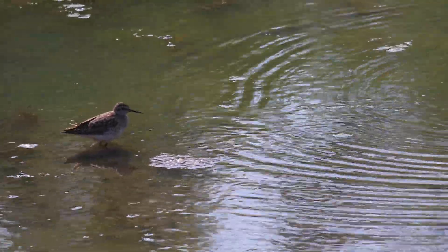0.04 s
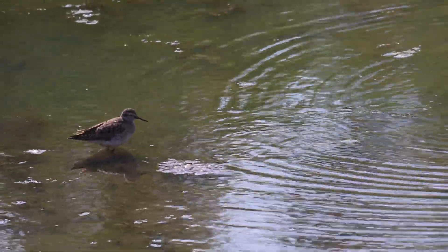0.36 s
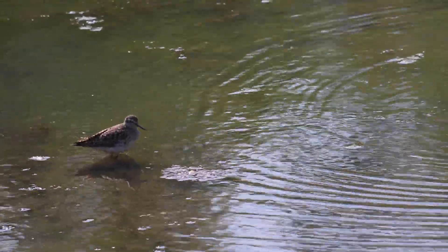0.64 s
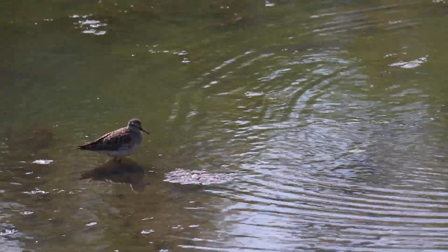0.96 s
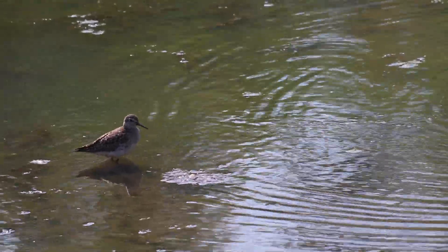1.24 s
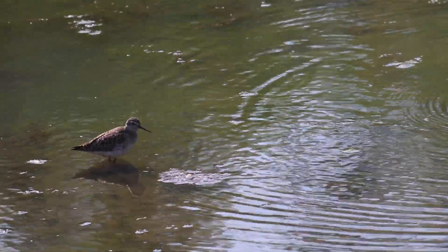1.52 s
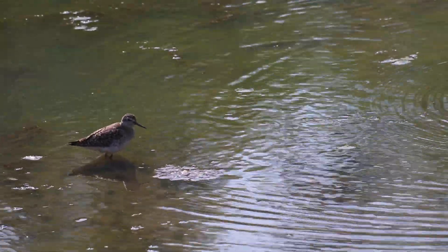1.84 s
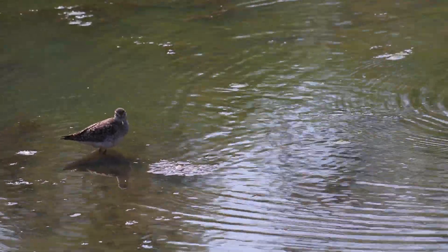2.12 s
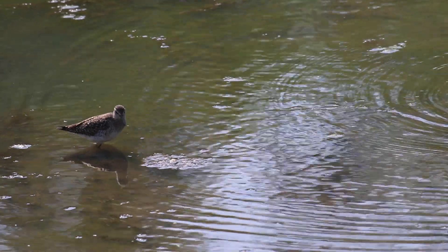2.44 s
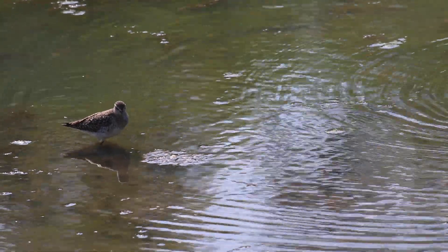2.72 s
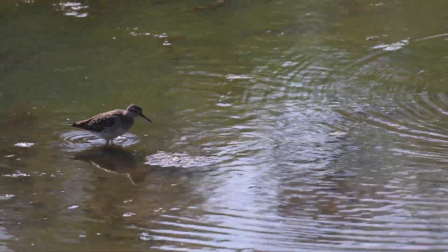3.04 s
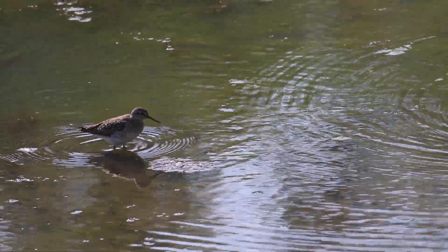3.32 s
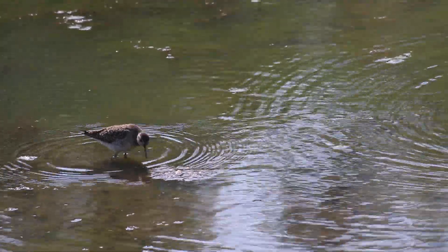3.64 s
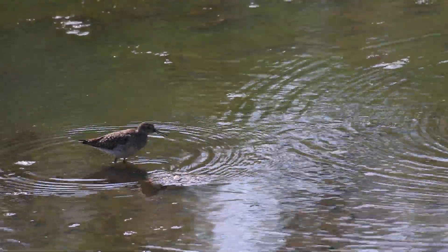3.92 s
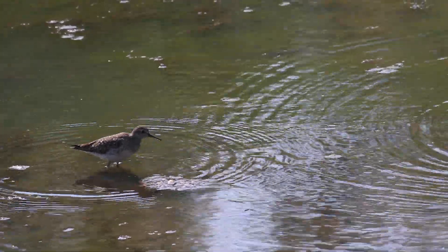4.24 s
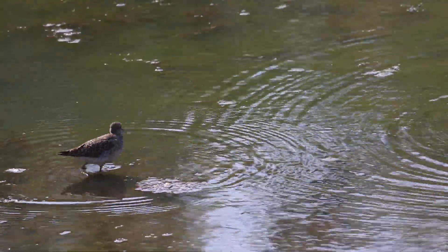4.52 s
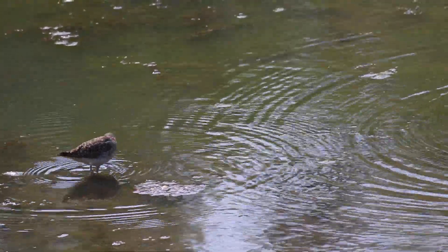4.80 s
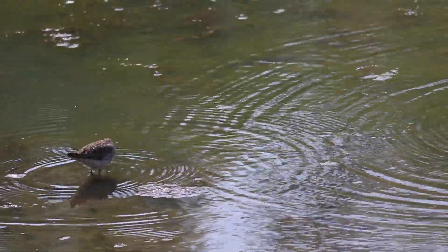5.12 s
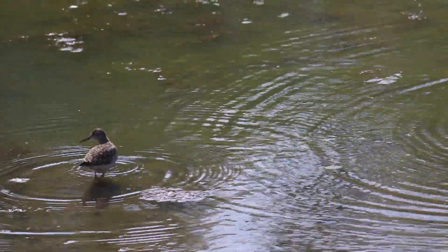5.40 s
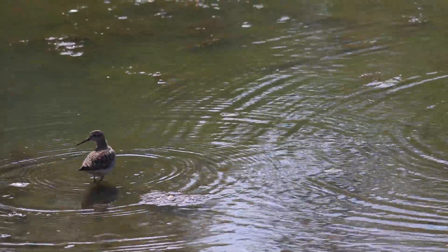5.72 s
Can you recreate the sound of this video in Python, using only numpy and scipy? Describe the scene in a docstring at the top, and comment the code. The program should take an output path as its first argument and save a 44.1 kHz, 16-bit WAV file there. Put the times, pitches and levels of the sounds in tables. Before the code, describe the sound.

A quiet pond margin with a faint steady hiss, dominated by gusts of wind on the microphone. For the first second the air is fairly calm: a distant songbird warbles faint, slurred whistles, and a few small dry ticks sound close by at about 0.5 seconds. A run of thin high peeps follows from 0.8 to 1.9 seconds. Wind swells into a lumpy low rumble with short thumps around 1.4 to 1.7 seconds. A faint, high buzzing trill comes at 2 to 2.6 seconds. The loudest gust hits near 3 seconds, thumping mostly on the right and fading by 3.6. In the lull, faraway song and brief high chirps echo softly. Milder buffeting returns from about 5 seconds to the end, along with a second faint trill and one sharp, close dry tick at 5.6 seconds.

```python
"""Gusts of wind buffet two microphone ports at a quiet pond margin: a lumpy rumble swells and dies,
and each eddy lands as a short low thump on one side. Some way off, small birds whistle, chip, peep
and trill in gliding near-sine tones that echo off the banks; the farthest are just a blur of noise.
Twice something dry ticks close by. A faint steady hiss lies under it all, and a limiter ducks
the mix on the hardest thumps."""
import sys
import numpy as np
from scipy import signal
from scipy.fft import rfft, irfft
from scipy.io import wavfile
from scipy.ndimage import uniform_filter1d

SR = 44100
rng = np.random.default_rng(int(sys.argv[2]) if len(sys.argv) > 2 else 0)


def generate_wav(sig):
    """Save sig (samples, or channels by samples) to the path in sys.argv[1] as 16-bit PCM at SR."""
    pcm = np.round(np.clip(np.atleast_2d(sig).T, -1, 1) * 32767).astype(np.int16)
    wavfile.write(sys.argv[1], SR, pcm)


N = 258426
TIME, FREQS = np.arange(N) / SR, np.fft.rfftfreq(N, 1 / SR)

# Levels are set before each layer's trim. Pan is left minus right. Arch is the bend at mid-note.
# tone of the background wash: (frequency [Hz], relative level [dB])
AIR_SPECTRUM = [(15, -61), (25, 4), (60, 7.5), (150, -0.5), (290, -5), (480, -5), (600, -11), (820, -6),
                (1100, -13), (1750, -15), (2300, -14), (3200, -15), (5500, -20), (15500, -27.5)]
# stereo image of the wash: (frequency [Hz], left-right likeness [0-1])
AIR_LIKENESS = [(60, 0.91), (130, 0.79), (300, 0.82), (640, 0.64), (1400, 0.52), (3100, 0.036),
                (7000, 0.012)]
# far songs blurred by their echoes, plus a high haze behind the peeps: (time [s], length [s], centre [Hz],
# width [Hz], level [dB])
FAR_PHRASES = [(0, 0.11, 3560, 300, -61), (0.096, 0.33, 2700, 500, -66), (0.301, 0.047, 4600, 2000, -58.5),
               (0.353, 0.52, 3720, 240, -65), (1.201, 0.58, 5100, 350, -69), (1.182, 0.66, 1560, 460, -57),
               (1.269, 0.42, 3200, 220, -63.5), (1.681, 1.48, 2250, 420, -61),
               (1.943, 0.23, 3230, 1800, -61.5), (2.097, 0.31, 2850, 200, -64),
               (2.737, 0.26, 3350, 180, -61.5), (3.026, 0.82, 2320, 422, -59), (3.2, 0.43, 1410, 597, -63),
               (3.875, 0.51, 3780, 400, -65), (4.001, 0.9, 2280, 386, -59), (4.652, 0.058, 4600, 1500, -59),
               (5.122, 0.61, 1640, 220, -60.5)]
# a warbling songbird's slurs: (time [s], length [s], start [Hz], end [Hz], arch [Hz], level [dB])
WHISTLE_NOTES = [(0, 0.02, 2625, 2220, 80, -54), (.012, 0.028, 2300, 2400, 265.5, -55),
                 (.027, 0.061, 2685, 2600, 279, -54), (.16, 0.027, 2160, 2450, 149, -64),
                 (.245, 0.16, 3040, 2130, -110, -60), (.265, 0.086, 3100, 3110, 186, -62.5),
                 (.458, 0.066, 2150, 1800, 98, -56), (.525, 0.035, 1777, 1980, 140, -61),
                 (.585, 0.081, 3630, 3740, 30, -60), (.68, 0.11, 3010, 2460, -250, -62.5),
                 (1.0, 0.031, 2480, 2630, 0, -62), (1.042, 0.062, 2030, 2280, -90, -61),
                 (1.08, 0.054, 2164, 1600, -90, -67), (1.245, 0.063, 2820, 2610, 258, -62.5),
                 (1.32, 0.1, 2510, 2277, -55, -58), (1.785, .05, 2270, 2180, -120, -61),
                 (1.92, 0.043, 2250, 2000, 58, -59), (2.122, 0.04, 3680, 4230, -70, -62),
                 (2.368, 0.071, 3710, 3800, -33, -61), (4.915, 0.017, 4000, 2660, 0, -64),
                 (4.95, 0.03, 3300, 2100, -100, -62.5), (4.95, 0.05, 3820, 3850, -135, -62.5)]
# a nearer bird's thin chips: (time [s], length [s], start [Hz], end [Hz], level [dB])
CHIP_NOTES = [(0.44, .035, 4520, 4180, -65), (3.648, .04, 4380, 4260, -70), (4.252, .022, 5800, 4200, -68),
              (4.594, 0.043, 4160, 4050, -64), (4.914, 0.043, 5700, 3460, -60),
              (5.027, 0.029, 4600, 4170, -62), (5.264, 0.056, 4700, 4540, -63),
              (5.69, 0.035, 4660, 4240, -64)]
# a run of high peeps, about seven a second: (time [s], level [dB])
PEEP_NOTES = [(.835, -70), (.98, -64), (1.12, -62), (1.288, -70), (1.42, -67), (1.56, -71), (1.708, -63),
              (1.858, -64)]
# buzzing trills: (time [s], length [s], pitch [Hz], sag [Hz/s], level [dB], pulse rate [Hz],
# pulse depth [0-1], pitch swing [Hz], pan [dB], right port lag [rad])
TRILL_CALLS = [(2.01, .595, 4780, 35, -57.3, 120, .7, -70, 3, 1.6),
               (5.055, .56, 4858, 150, -60, 136, .33, 30, 0, .76)]
# dry ticks: (time [s], peak [dB], rasp decay [s], tilt [dB/octave], ring level [dB], pan [dB])
TICK_HITS = [(0.439, -42, .002, -4, -14, 5), (.548, -35, 0.0072, -4.5, -1, -10),
             (0.5663, -34.5, .0005, 3, -17, 12), (.572, -36.5, 0.0081, 5, -9, -16.5),
             (.588, -38.5, 0.0029, 5, 2, 11), (5.5778, -24, 0.0019, 1.3, 6, 4),
             (5.582, -39, 0.0023, -5, 2, 0)]
# resonances of the ticking thing: (frequency [Hz], width [Hz], relative level [dB])
TICK_RESONANCES = [(880, 580, 19.5), (2274, 373, 29.5), (2316, 238, 30), (3330, 520, 16), (3930, 300, 11.5),
                   (4600, 630, 9), (7700, 3500, -5)]
# tone of the turbulence on the ports: (frequency [Hz], relative level [dB])
RUMBLE_SPECTRUM = [(15, -36), (30, -11), (60, 6), (100, 5), (180, -0.5), (270, -11.5), (420, -24.5),
                   (700, -40), (1500, -43), (3000, -100)]
# swells of wind: (crest time [s], rise [s], fall [s], level [dB], pan [dB])
WIND_GUSTS = [(0.09, 0.075, 0.037, -40, -5), (0.26, 0.15, 0.3, -55, 11.5), (0.78, 0.29, 0.22, -52.5, 2),
              (1.09, 0.094, 0.24, -37.5, -0.5), (1.41, 0.17, 0.18, -25, 1), (1.64, 0.084, 0.22, -21.5, -2),
              (2.02, 0.19, 0.38, -45, -10.5), (2.45, 0.23, 0.3, -48, -19.5), (2.7, 0.15, 0.16, -35.5, -17),
              (2.96, 0.15, 0.25, -19, -3.5), (3.3, 0.41, 0.33, -27, -6), (3.589, 0.12, 0.093, -35.5, -6.5),
              (4.22, 0.093, 0.14, -46, -13), (4.58, 0.57, 0.9, -48, -5.5), (4.94, 0.067, 0.096, -40, -17.5),
              (5.16, 0.17, 0.39, -34.5, -16), (5.44, 0.21, 0.34, -32, -3), (5.85, 0.089, .15, -36, -0.5)]
# the hardest eddies: (time [s], level [dB], centre [Hz], port [0 left, 1 right])
HARD_EDDIES = [(0.087, -25.5, 111, 1), (0.264, -26.5, 89.5, 0), (1.029, -22.5, 118, 0),
               (1.084, -17, 135, 0), (1.401, -9, 140.5, 0), (1.448, -12.5, 108, 0), (1.526, -15.5, 103, 0),
               (1.593, -4.5, 216, 1), (1.61, -4, 106, 0), (1.623, -10.5, 222, 1), (1.655, -9, 224, 0),
               (1.672, -8.5, 223, 0), (1.962, -28, 156, 1), (2.016, -18.5, 134, 1), (2.361, -26, 106, 1),
               (2.439, -30.5, 90, 1), (2.727, -18, 132, 1), (2.832, -6.5, 155, 1), (2.907, -10, 216, 1),
               (2.927, -2.5, 259, 1), (2.948, -11.5, 326, 1), (2.963, 4.5, 321, 1), (2.974, 3, 189, 0),
               (3.012, -8.5, 176, 0), (3.057, -5.5, 155, 1), (3.102, -5.5, 170, 1), (3.221, -12, 237, 1),
               (3.307, -8.5, 183, 1), (3.408, -12.5, 195, 1), (3.525, -17.5, 125, 1),
               (4.232, -26.5, 116, 1), (4.935, -22.5, 145, 1), (5.1, -13.5, 168, 1), (5.225, -17.5, 206, 1),
               (5.44, -14.5, 120, 1), (5.524, -18.5, 137, 0)]


def gain_of(db):
    """Decibels to amplitude."""
    return 10 ** (np.asarray(db) / 20)


def unit_rms(x):
    """Scales to rms 1."""
    return x / np.sqrt(np.mean(x ** 2) + 1e-20)


def curve(points):
    """Draws an EQ-style curve through the points on a log-frequency axis."""
    hz, value = np.transpose(points)
    return np.interp(np.log(FREQS + 1), np.log(hz + 1), value)


def noise(gain):
    """Two unrelated noises of rms 1 with the given spectrum."""
    return unit_rms(irfft(rfft(rng.standard_normal((2, N))) * gain, N))


def panned(x, pan_db):
    """Places a sound between the ports."""
    return x * gain_of([[pan_db / 2], [-pan_db / 2]])


def add(mix, s, sound):
    """Mixes a sound in at time s."""
    part = mix[..., max(round(s * SR), 0):][..., :sound.shape[-1]]
    part += sound[..., :part.shape[-1]]


def air(level_db=-52, swell_db=0.62):
    """The bed: a steady far wash, nearly mono in the bass and wide in the hiss."""
    left, other = noise(gain_of(curve(AIR_SPECTRUM)))
    likeness = curve(AIR_LIKENESS)
    right = irfft(likeness * rfft(left) + np.sqrt(1 - likeness ** 2) * rfft(other), N)
    return gain_of(level_db + swell_db * noise(FREQS < 4)[0]) * np.array([left, right])


def far_songs(flutter_db=2.0, trim_db=-1):
    """The farthest birds arrive only as a fluttering band of noise round their pitch; one high band hangs on
    behind the run of peeps."""
    out, freqs = np.zeros((2, N)), np.fft.rfftfreq(2 * SR, 1 / SR)
    for s, length, hz, width, db in FAR_PHRASES:
        count = int(length * SR)
        band = np.exp(-2 * ((freqs - hz) / width) ** 2)
        blur = unit_rms(irfft(rfft(rng.standard_normal((2, 2 * SR))) * band))[:, :count]
        add(out, s, gain_of(db + trim_db) * blur * signal.windows.cosine(count))
    return out * unit_rms(gain_of(flutter_db * noise(FREQS < 30)[0]))


def bank_echoes(send, t60, echoes_per_s=2000, predelay_s=0.008):
    """A thin reverb, scattered back from the banks and their plants."""
    t = np.arange(SR) / SR
    taps = rng.standard_normal((2, SR)) * (rng.random((2, SR)) < echoes_per_s / SR)
    tail = taps * (t > predelay_s) * gain_of(-60 * t / t60)
    return signal.fftconvolve(send, tail / np.linalg.norm(tail[0]), axes=1)[:, :N]


def bird_notes(rows, pan_db, waver=0.0056, flutter_db=1.5, lag_rad=1.46):
    """Each note is a near sine that glides along an arch from one pitch to another."""
    out, shake = np.zeros((2, N)), noise(FREQS < 150)
    for s, length, start, end, arch, db in rows:
        progress = np.linspace(0, 1, int(length * SR))
        wobble, flutter = shake[:, int(s * SR):][:, :len(progress)]
        glide = start + (end - start) * progress + arch * (1 - (2 * progress - 1) ** 2)
        hz = glide * (1 + waver * wobble)
        # the port away from the bird hears it part of a cycle later
        phase = 2 * np.pi * np.cumsum(hz) / SR - np.array([[0], [np.copysign(lag_rad, pan_db)]])
        tone = np.sin(phase) * signal.windows.tukey(len(hz), .6) * gain_of(flutter_db * flutter)
        add(out, s, panned(gain_of(db) * unit_rms(tone), pan_db))
    return out


def whistles(trim_db=-1.5):
    """A songbird warbles in slurred, wavering whistles, a little to the right."""
    return gain_of(trim_db) * bird_notes(WHISTLE_NOTES, pan_db=-2, waver=0.0078)


def peeps(length_s=0.056, first_hz=5290, fall_hz=230, arch_hz=-50, climb_hz_per_s=110, trim_db=-1.5):
    """One falling peep, repeated on the left; the run creeps up in pitch."""
    rows = []
    for s, db in PEEP_NOTES:
        hz = first_hz + climb_hz_per_s * (s - PEEP_NOTES[0][0])
        rows.append((s, length_s, hz, hz - fall_hz, arch_hz, db))
    return gain_of(trim_db) * bird_notes(rows, pan_db=3.5)


def chips(arch_hz=61):
    """A nearer bird's quick downward flicks, all slightly arched."""
    rows = [(s, length, start, end, arch_hz, db) for s, length, start, end, db in CHIP_NOTES]
    return bird_notes(rows, pan_db=2)


def trill(s, length, pitch_hz, sag, db, rate, depth, swing_hz, pan_db, lag_rad,
          attack_s=0.098, release_s=0.068, jitter=0.0099, waver_hz=14, flutter_db=1.5, trim_db=-2.5):
    """A high whistle chopped into fast pulses; the pitch swings with every pulse and slowly sags."""
    wobble, flutter = noise(FREQS < 14)
    hz = pitch_hz - sag * (TIME - s) + waver_hz * wobble
    pulse_hz = rate * (1 + jitter * noise(FREQS < 40)[0])
    pulse = np.cos(2 * np.pi * np.cumsum(pulse_hz) / SR)
    phase = 2 * np.pi * np.cumsum(hz + swing_hz * pulse) / SR - np.array([[0], [lag_rad]])
    buzz = unit_rms((1 + depth * pulse) * np.sin(phase))
    envelope = np.clip(np.minimum((TIME - s) / attack_s, (s + length - TIME) / release_s), 0, 1)
    return panned(gain_of(db + trim_db + flutter_db * flutter) * buzz * envelope, pan_db)


def ticks(crack_db=-9, dull_hz=2500, size=4096):
    """Something dry, close by: a sharp snap and a brief rasp ring a few short resonances."""
    out, t, freqs = np.zeros((2, N)), np.arange(size) / SR, np.fft.rfftfreq(size, 1 / SR)
    crack = gain_of(crack_db) / (1 + 1j * freqs / dull_hz)
    ring = sum((-1) ** k * gain_of(db) / (1 + 2j * (freqs - hz) / width)
               for k, (hz, width, db) in enumerate(TICK_RESONANCES))
    for s, db, decay, tilt_db, ring_db, pan_db in TICK_HITS:
        push = 0.2 * rng.standard_normal((2, size)) * np.exp(-t / decay)  # the rasp
        push[:, 0] += 2  # the snap
        tilt = gain_of(tilt_db * np.log2(freqs / 1000 + .5))
        tick = irfft(rfft(push) * (crack + gain_of(ring_db) * ring) * tilt)
        add(out, s, panned(gain_of(db) * tick / abs(tick).max(), pan_db)[:, :size // 2])
    return out


def gust_strength(calm_db=-65, drop_db=22.5, shape=2.28):
    """The wind's envelope at each port in dB: gusts swell and die away over a light breeze."""
    t, power = np.linspace(0, TIME[-1], 1500), gain_of(calm_db) ** 2
    for crest, rise, fall, db, pan_db in WIND_GUSTS:
        away = np.maximum((crest - t) / rise, (t - crest) / fall)  # 1 where the gust is drop_db down
        power = power + panned(gain_of(db - drop_db * away ** shape), pan_db) ** 2
    return np.array([np.interp(TIME, t, 10 * np.log10(port)) for port in power])


def lesser_eddies(strength_db, per_s=24, over_db=6.5, spread_db=2.0, hz_at_0_db=230.5, db_per_octave=28.5):
    """Eddies hit each port by chance; a stronger wind makes them harder and brighter."""
    slots = N // 64
    chance, size = rng.random((2, slots)), rng.standard_normal((2, slots))
    port, slot = np.nonzero(chance < per_s * TIME[-1] / slots)
    onset = slot * 64
    db = strength_db[port, onset] + over_db + spread_db * size[port, slot]
    return list(zip(onset / SR, db, hz_at_0_db * 2 ** (db / db_per_octave), port))


def swirl(t, hz, turn, skew=2.87):
    """One push and pull of air; a smaller, faster eddy gives a shorter and brighter thump."""
    return (np.exp(2j * np.pi * turn) * (1 - 2j * np.pi * hz * t / (skew + .5)) ** -(skew + 1)).real


def wind(rumble_trim_db=-4, lump_db=4, wake_db=-8, shred_db=-16, shred_ratio=2.47):
    """Each port rumbles with its own lumpy turbulence; eddies push once or twice and are gone."""
    strength_db = gust_strength()
    lumps = gain_of(lump_db * noise(FREQS < 20))
    rumble = unit_rms(noise(gain_of(curve(RUMBLE_SPECTRUM))) * lumps)
    out = gain_of(strength_db + rumble_trim_db) * rumble
    t = np.arange(-SR // 20, SR // 20) / SR
    eddies = HARD_EDDIES + lesser_eddies(strength_db)
    for s, db, hz, port in eddies:
        turn, lateness, shred_turn = rng.random(3)
        thump = swirl(t, hz, turn)
        wake = gain_of(wake_db) * swirl(t - (0.8 + .5 * lateness) / hz, hz, turn)
        # a breaking eddy sheds a smaller one, most audible on the hardest hits
        shred = gain_of(shred_db + db / 2) * swirl(t - (lateness - .5) / hz, hz * shred_ratio, shred_turn)
        add(out[port], s + t[0], gain_of(db) * (thump + wake + shred))
    return out


def scene():
    """The mix: birds and ticks with a short and a long reverb, the air bed, and wind up front."""
    trills = sum(trill(*row) for row in TRILL_CALLS)
    song, peeping, calls, snaps = whistles(), peeps(), chips(), ticks()
    near_send = gain_of(-8) * calls + gain_of(-13) * trills + gain_of(-12) * snaps
    far_send = gain_of(-3.5) * song + gain_of(-3) * peeping
    echoes = bank_echoes(near_send, t60=0.31) + bank_echoes(far_send, t60=0.8)
    return song + peeping + calls + trills + snaps + echoes + far_songs() + air() + wind()


def record(dry, threshold_db=-3, release_db_per_s=70, cutoff_hz=15850):
    """A limiter ducks everything after the hardest thumps; a steep low-pass takes off the very top."""
    release = TIME * release_db_per_s
    peak_db = 20 * np.log10(abs(dry).max(0) + 1e-9)
    held_db = np.maximum.accumulate(peak_db + release) - release
    duck_db = uniform_filter1d(np.maximum(held_db - threshold_db, 0), size=200)
    lowpass = signal.firwin(1023, cutoff_hz, window=("kaiser", 9), fs=SR)
    return signal.oaconvolve(dry / gain_of(duck_db), lowpass[None], "same")


dry = scene()
out = record(dry)
generate_wav(out)
```